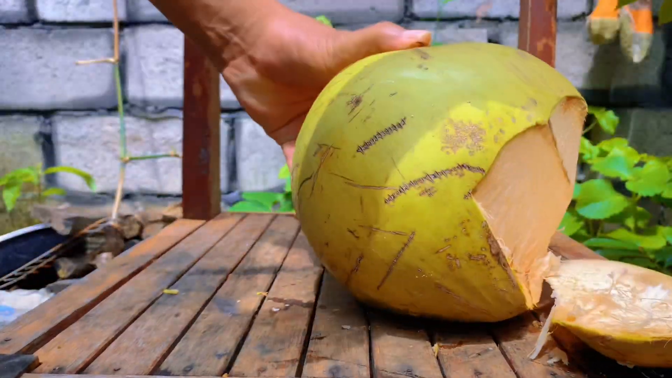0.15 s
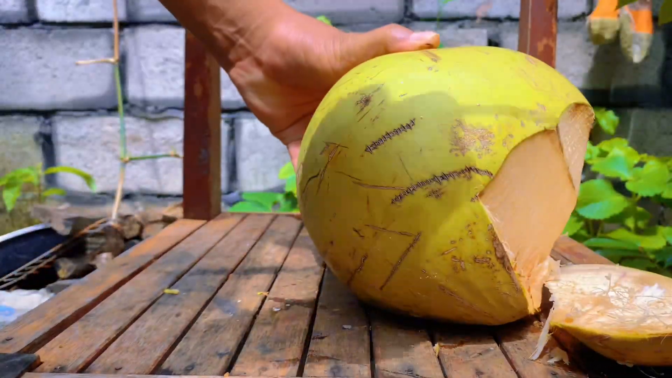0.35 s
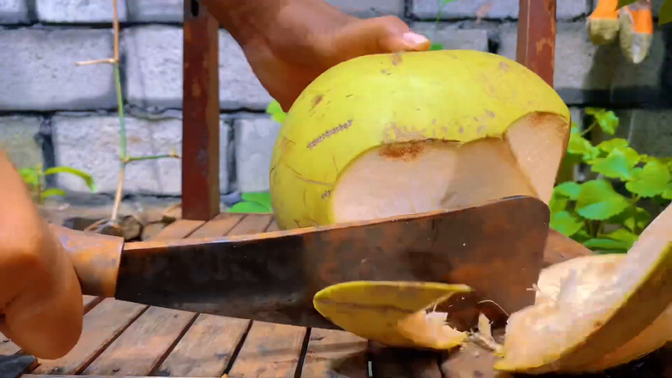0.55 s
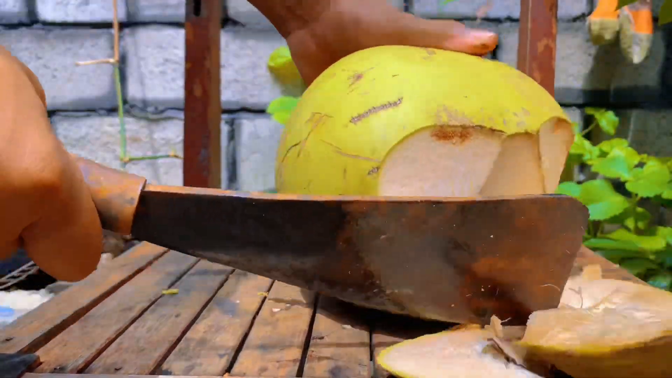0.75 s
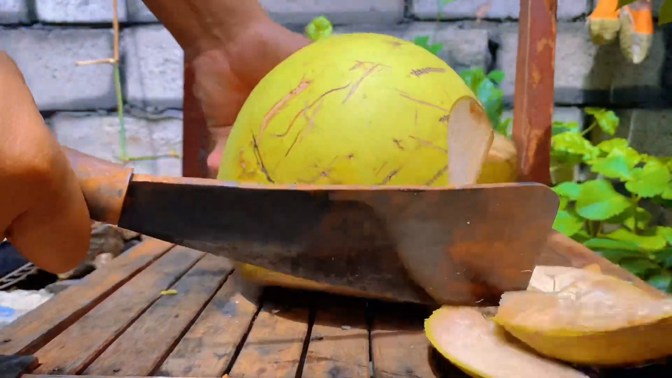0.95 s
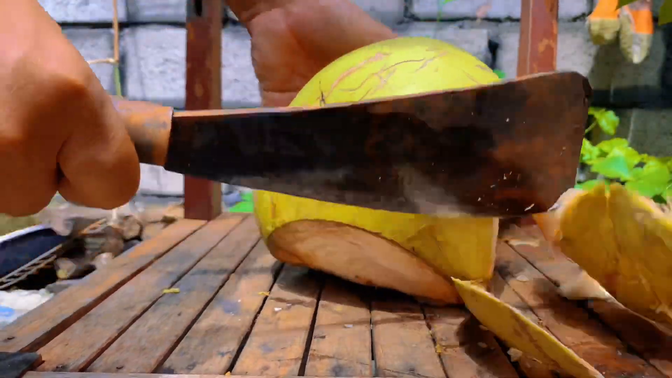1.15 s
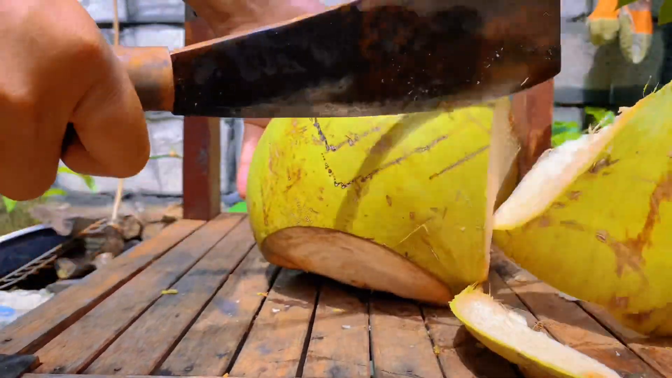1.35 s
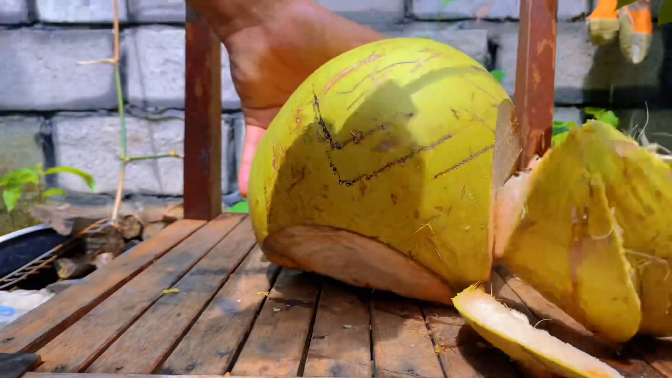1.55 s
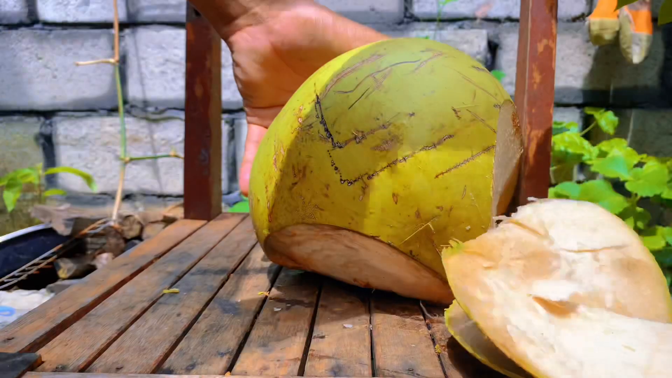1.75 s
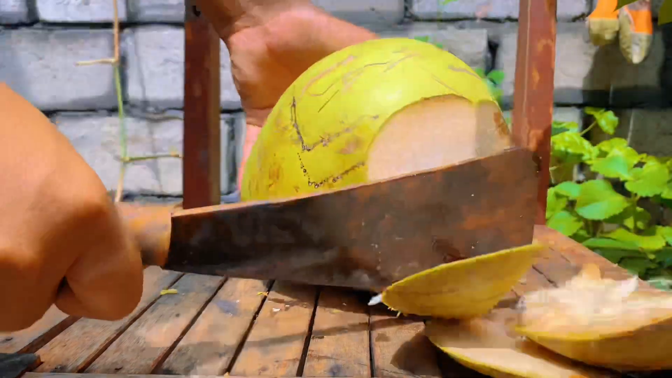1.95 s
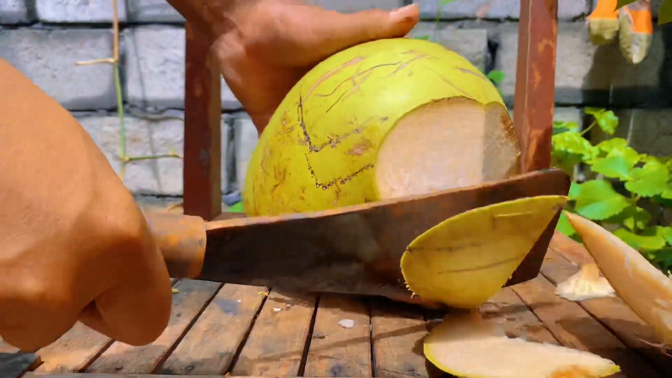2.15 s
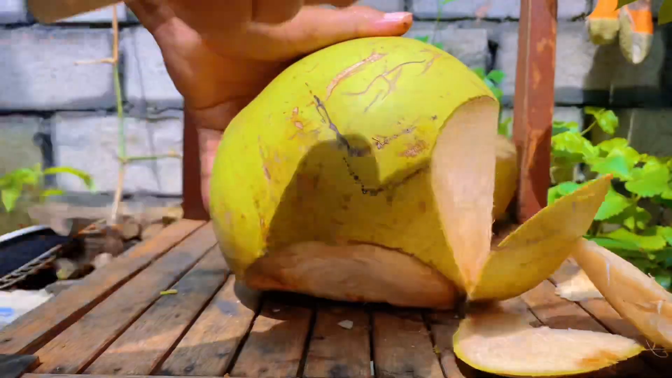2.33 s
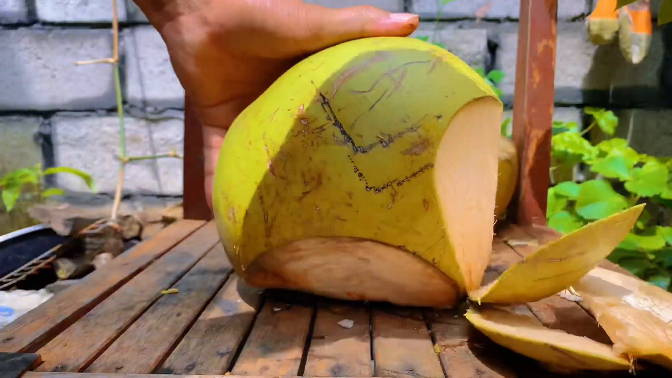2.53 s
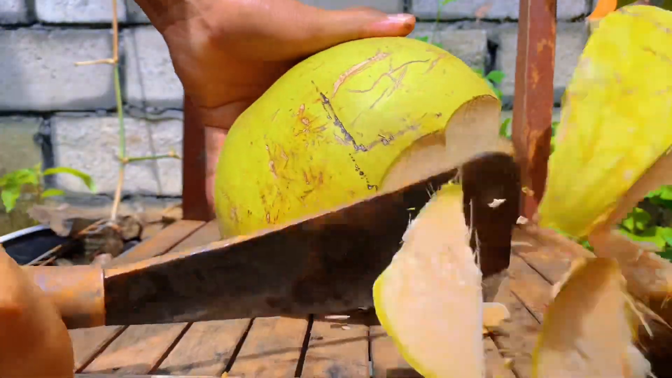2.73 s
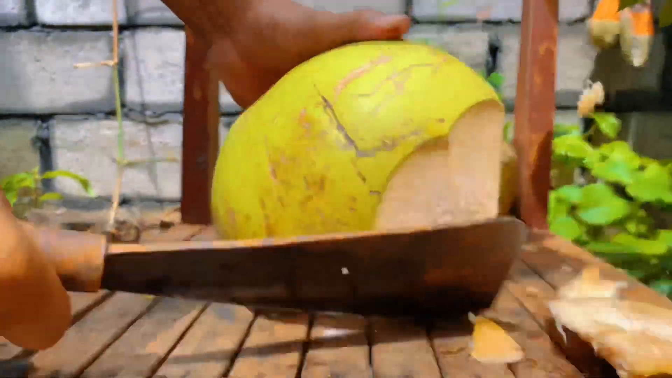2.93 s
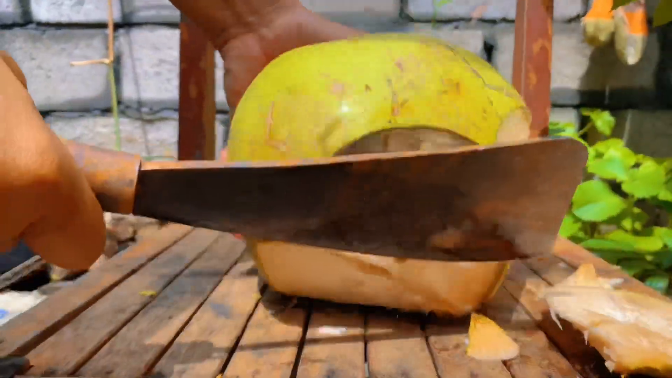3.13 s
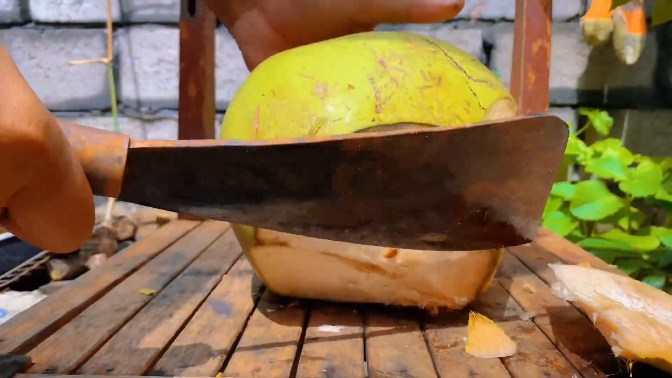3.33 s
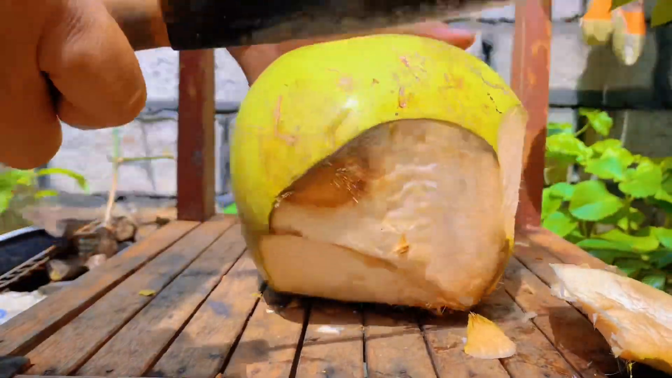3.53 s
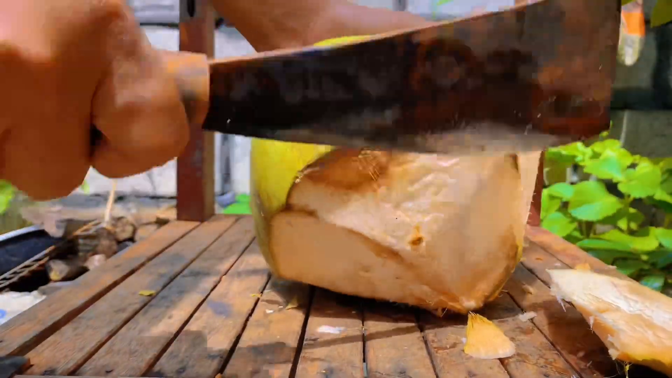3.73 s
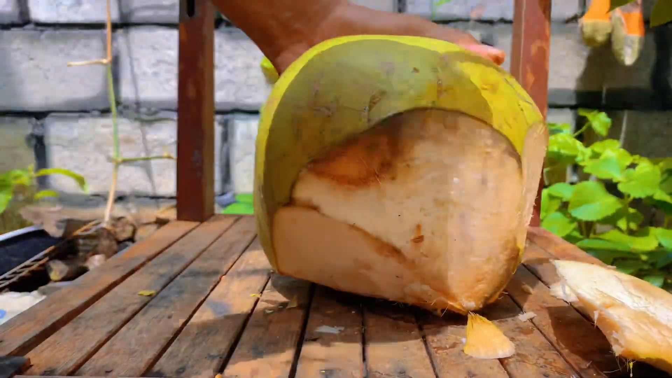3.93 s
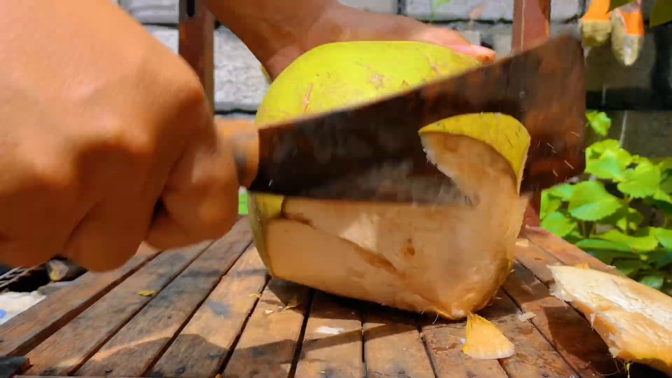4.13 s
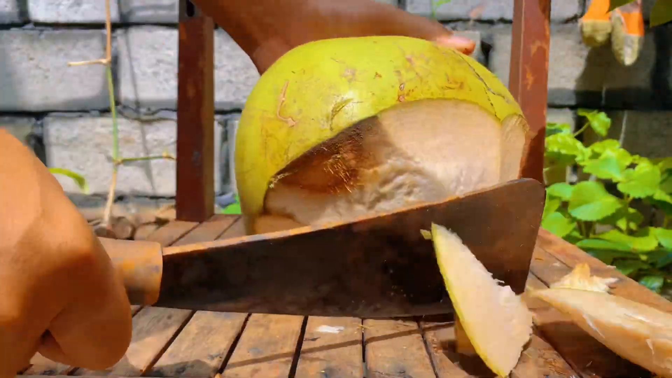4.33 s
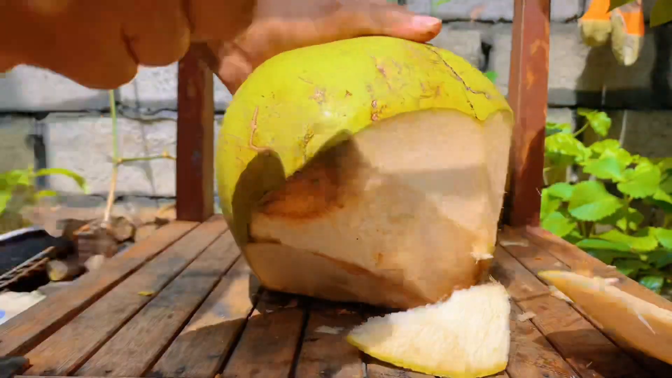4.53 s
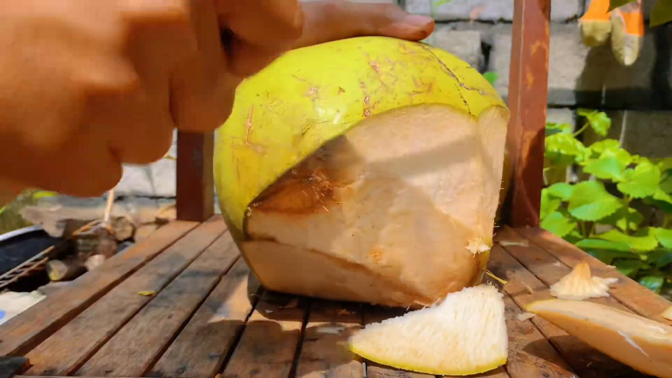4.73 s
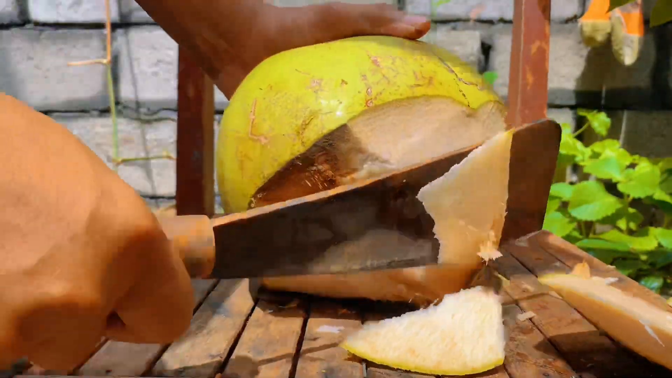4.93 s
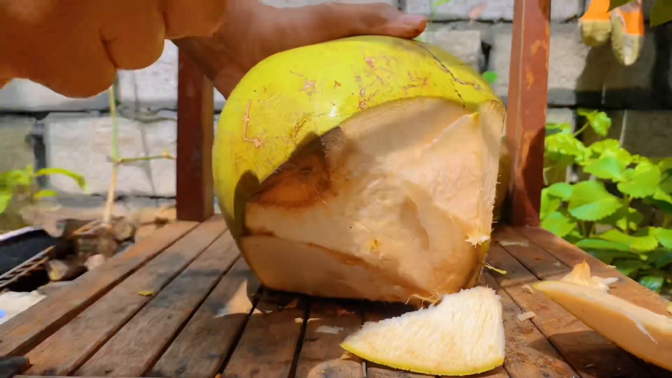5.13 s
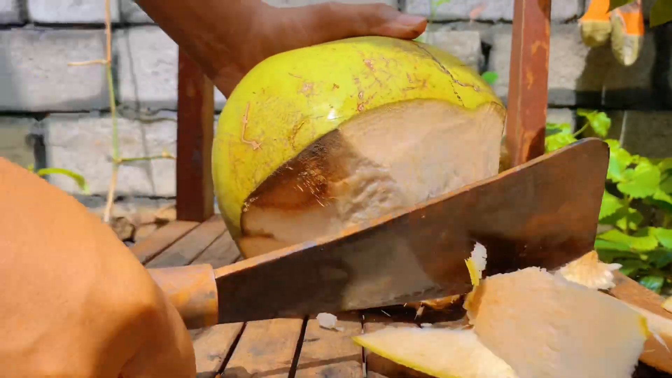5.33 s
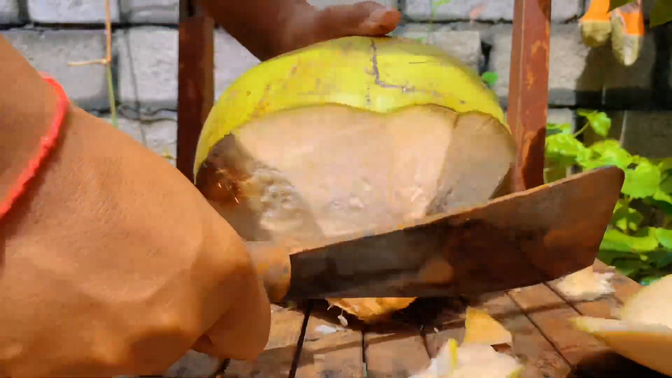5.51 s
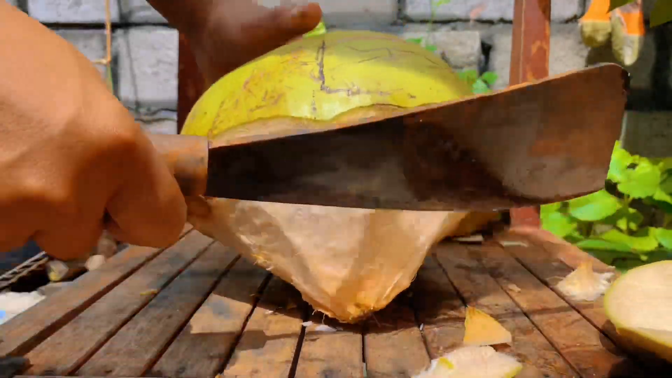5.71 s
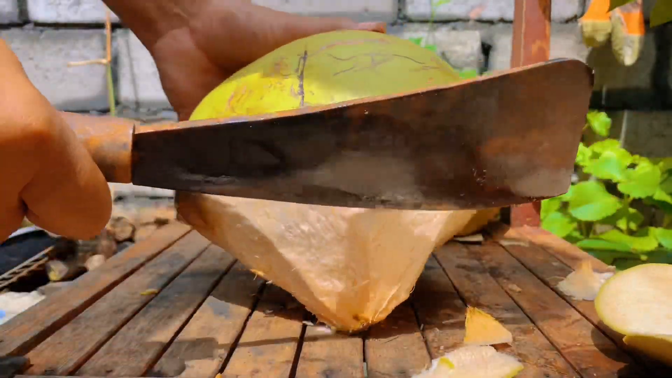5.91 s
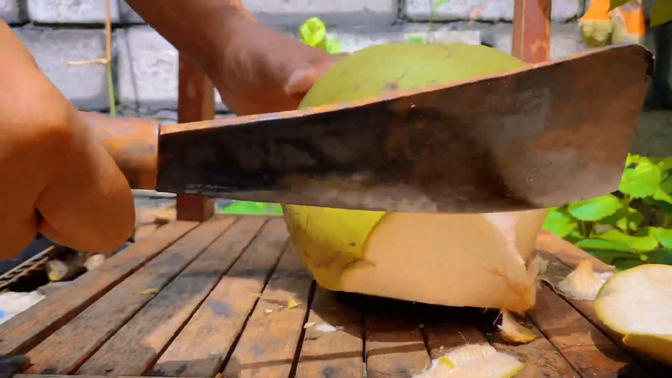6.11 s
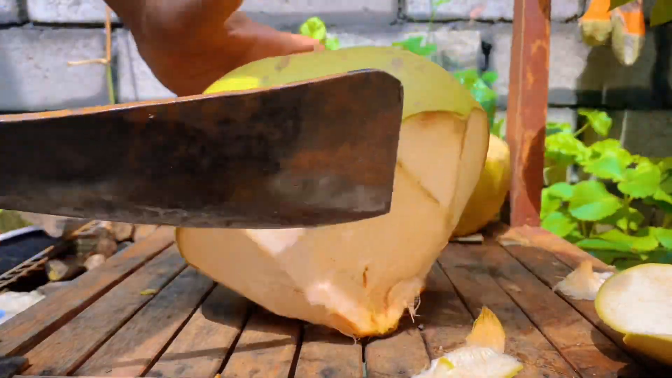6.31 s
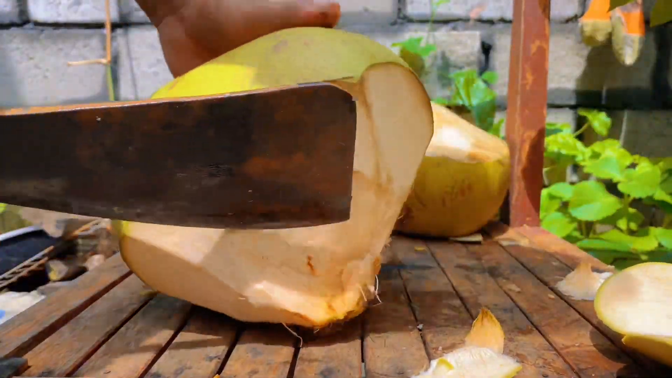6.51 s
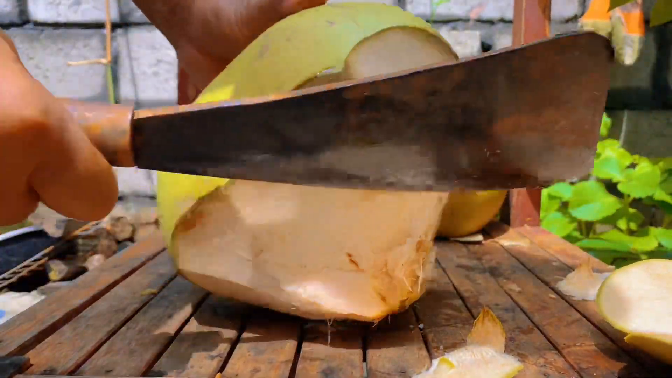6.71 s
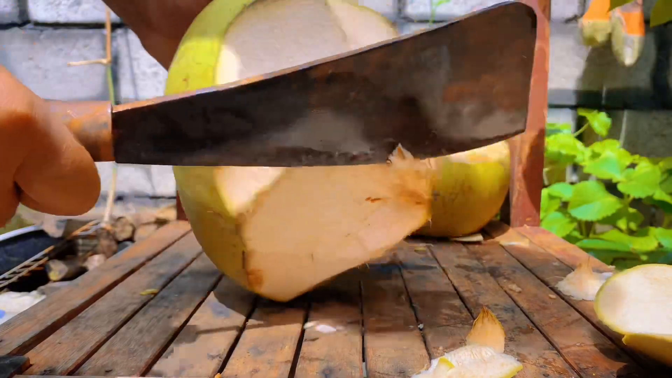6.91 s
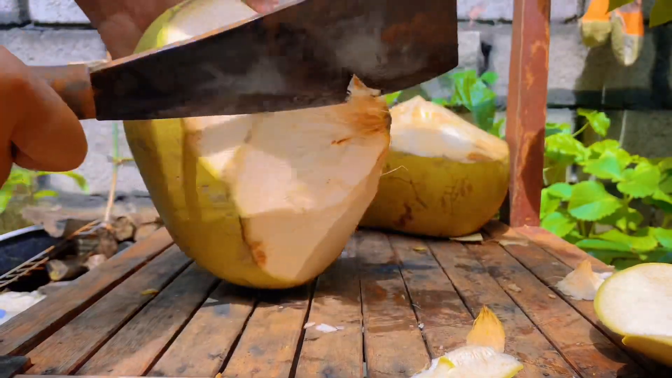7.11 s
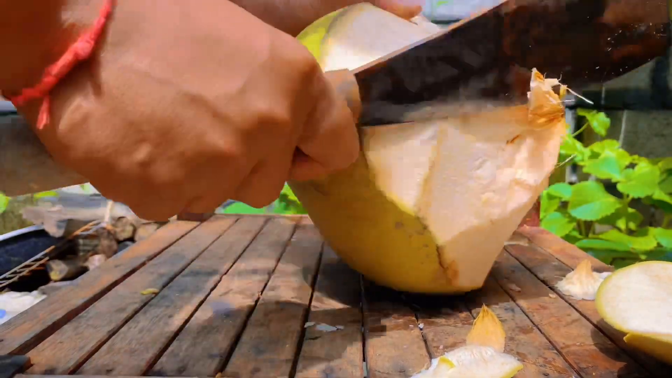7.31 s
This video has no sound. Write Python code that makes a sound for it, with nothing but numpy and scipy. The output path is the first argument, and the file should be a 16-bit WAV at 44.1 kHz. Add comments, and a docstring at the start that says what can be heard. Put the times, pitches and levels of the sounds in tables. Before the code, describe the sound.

Three strong chops in the first three seconds, each a fibrous crunch with a steely edge and a woody thud, followed by rattling chips, low rumbling and dry husk rubs. Dull knocks hit the microphone, then it grows quiet with softer cuts and taps. A last hard blow lands past five seconds, leaving small taps and rustle. Close stereo microphone, short yard echo.

```python
"""A machete trims a green coconut on a slatted wooden table in a walled yard.
Each chop is a jerky burst of fibre clicks that excites blade resonances, a crack with damped modes, and a thud;
chips tap the slats. Between chops the turning nut rubs as filtered clicks, with fibre snaps and thin squeaks.
The yard answers with decaying noise. A few dry hollow bumps, swelling tones with a scuff, sit right at the
microphone; a faint distant hum is narrow noise."""
import sys
import numpy as np
from scipy import signal
from scipy.fft import rfft, irfft, next_fast_len
from scipy.io import wavfile

SR = 44100
rng = np.random.default_rng(int(sys.argv[2]) if len(sys.argv) > 2 else 0)


def write(x):
    x = np.atleast_2d(x).T
    wavfile.write(sys.argv[1], SR, np.round(np.clip(x, -1, 1) * 32767).astype(np.int16))


N = 328986
TIME = np.arange(N) / SR
AGE = TIME[:SR // 2]  # time since an event's onset, s

# The nut shifting on the table: t/s, table rumble level/dB, rolling level/dB
ROCKING = [(0.0, -43, -43.5), (0.31, -52, -54.5), (0.62, -43.5, -45.5), (1.02, -54.5, -50.5),
           (1.91, -52.5, -61), (2.1, -46, -42), (2.39, -50, -54.5), (2.64, -52, -58.5),
           (2.83, -50.5, -46.5), (2.95, -55, -62.5), (3.16, -64, -64.5), (3.82, -83.5, -81),
           (4.26, -80.5, -73), (5.28, -68, -76.5), (5.48, -64.5, -60.5), (5.75, -67, -71),
           (6.9, -66.5, -69.5), (7.46, -75, -73.5)]
# Faint rustle of husk under the hand: t/s, rubbing level/dB, fibre hiss level/dB
RUSTLE = [(0.0, -58.5, -68), (0.41, -65, -78), (0.64, -53.5, -62.5), (1.64, -65.5, -74.5), (2.16, -57, -57),
          (2.3, -61.5, -70), (3.95, -82, -96.5), (4.24, -78, -91), (5.28, -93, -99), (5.48, -68, -82.5),
          (7.1, -85.5, -87.5), (7.46, -75.5, -81.5)]
# Husk sliding as the nut is turned or the blade drawn back:
# t/s, length/s, rubbing level/dB, fibre hiss level/dB
SLIDES = [(0.12, 0.0026, -53.5, -67), (0.77, .15, -45, -51), (1.138, 0.1, -56, -63.5),
          (1.302, .005, -45, -70), (1.636, 0.0075, -54.5, -60.5), (2.138, 0.18, -54, -61),
          (2.255, 0.082, -49.5, -59.5), (3.25, .01, -73, -74), (3.668, 0.0041, -73.5, -75),
          (4.366, .01, -76, -94), (4.42, 0.019, -77, -79), (4.984, .02, -71, -70.5),
          (5.966, 0.12, -67, -71.5), (6.209, .045, -69.5, -75.5), (6.346, 0.0054, -69, -80),
          (6.622, 0.067, -58, -65.5), (6.751, 0.0089, -66, -72), (6.901, .08, -79, -82),
          (7.183, 0.24, -69.5, -78)]
# Hollow bumps at the microphone: t/s, level/dB, pitch f/Hz, scuff level/dB, scuff low-pass f/Hz, boom level/dB
BUMPS = [(0.027, -27, 310, -44, 4970, -36.5), (0.1419, -27.5, 269, -65, 3500, -38),
         (0.1455, -31.5, 536, -51, 2000, -54), (0.236, -38.5, 330, -54, 5030, -61),
         (0.235, -42.5, 520, -57, 2000, -45), (2.9069, -22, 367, -24, 1500, -37.5),
         (2.9134, -12.5, 1000, -14.5, 4730, -27), (2.92, -8, 465, -13.5, 6500, -21),
         (2.923, -20, 139, -10.5, 900, -24), (3.156, -15, 478, -32, 5000, -56),
         (3.1965, -31.5, 404, -45.5, 2940, -52), (3.2022, -16.5, 507, -41.5, 1506, -50.5)]
# Husk catching as it slides: t/s, length/s, pitch f/Hz, bandwidth/Hz, level/dB
SQUEAKS = [(0.29, 0.37, 1850, 210, -69), (0.744, 0.04, 1810, 300, -47.5), (1.43, 0.067, 913, 116, -62),
           (1.527, 0.088, 3380, 300, -67), (2.165, 0.078, 6460, 251, -59), (5.925, .17, 2077, 350, -66.5),
           (6.03, 0.065, 1260, 200, -64)]
# Blade passing through husk: t/s, length/s, level/dB, treble tilt above 1 kHz/(dB per octave)
CUTS = [(0.4157, 0.021, -13.5, 0), (1.8928, 0.021, -14.5, -0.5), (2.6764, 0.016, -14.5, 0.8),
        (4.1524, 0.027, -35.5, 1.5), (4.796, 0.0097, -43, -0.5), (4.806, 0.016, -34, 2.5),
        (5.2908, .003, -41, -2), (5.3084, 0.0072, -40.5, 2), (5.3196, 0.0043, -14, -6.5)]
# Blade biting or landing and driving the nut onto the table:
# t/s, knock level/dB, pitch f/Hz, low-pass f/Hz, left minus right/dB, thud level/dB, thud f/Hz
BLOWS = [(0.4183, -3.5, 955, 3040, -12.5, -11, 319), (0.426, -14, 1900, 4000, -5, -13.5, 162),
         (0.4366, -11, 1530, 2950, -9, -5.5, 227.5), (1.8958, -4, 910, 2570, -2, -14, 343),
         (1.908, -9.5, 1570, 3084, -4, -6, 242), (2.682, -17, 1350, 2900, -2, -37, 300),
         (2.697, 4, 1110, 2202, -2, -1.5, 212.9), (4.154, -19, 716.7, 1700, -9.5, -27.5, 254),
         (4.7994, -39, 1145, 1816, 0.5, -34, 285.6), (4.817, -44, 1400, 2500, -2, -33, 251),
         (5.2923, -45.5, 1400, 4000, -1, -31.5, 200), (5.3239, -4, 1200, 2880, -0.5, -5, 237),
         (5.324, -8, 2500, 5840, 2.5, -21.5, 150)]
# Chips and nut tapping the slats: t/s, knock level/dB, low-pass f/Hz, thud level/dB
TAPS = [(0.649, -43.5, 1500, -47), (0.973, -44, 1500, -45), (1.106, -40, 2210, -37),
        (1.1359, -36, 1840, -35.5), (1.298, -19.5, 2400, -35), (1.344, -30, 3500, -20.5),
        (1.965, -17.5, 2040, -36), (1.9977, -22, 1700, -42), (2.0172, -14, 2330, -28.5),
        (2.031, -15, 2000, -26), (2.0782, -22.5, 2050, -33.5), (2.5217, -36, 1490, -39.5),
        (2.809, -23.5, 3020, -26.5), (3.036, -56, 3000, -64), (3.6651, -46.5, 3016, -43),
        (4.2405, -34, 1800, -39.5), (4.443, -58.5, 2500, -50), (4.872, -39, 1600, -46),
        (4.9283, -38, 1780, -45.5), (5.01, -49, 1492, -60), (5.062, -55, 1800, -66),
        (5.726, -35.5, 6030, -62), (6.117, -39.5, 2230, -35.5), (6.1757, -53, 2000, -41.5),
        (6.239, -49, 3010, -47.5)]
# The nut tipping onto another face and rocking for a moment: t/s, thud level/dB, rocking level/dB
TIPS = [(0.56, -37, -46.5), (0.759, -33.5, -47), (1.295, -32, -38), (1.656, -35.5, -51), (2.22, -41, -45),
        (2.46, -47, -43), (4.22, -41, -58), (6.15, -39, -53.5), (6.26, -48.5, -59), (6.893, -48, -60),
        (7.02, -55, -59), (7.28, -53, -67)]
# The loudest fibres snapping: t/s, level/dB
SNAPS = [(0.565, -37.5), (0.624, -44), (0.6985, -36.5), (1.345, -31), (2.136, -31), (2.255, -41.5),
         (3.46, -54.5), (4.859, -40.5), (6.125, -45), (6.35, -60)]

# Modes of a hollow bump: f ratio to its pitch, level/dB, t60/s
HOLLOW_MODES = [(1.0, 6.5, .013), (1.2, -10.5, 0.026), (.76, -7, 0.018), (0.381, -18.5, .02)]
# Modes of a hard contact before strike-to-strike scatter: f ratio to its pitch, level/dB, t60/s
CONTACT_MODES = [(.52, -11, 0.015), (.78, -0.5, 0.01), (1, 0.5, 0.0085), (1.421, -7, 0.043),
                 (2.1, -9, 0.0065), (3.0, -13.5, 0.0077)]
# Modes of a struck slat: f/Hz, level/dB, t60/s
SLAT_MODES = [(750, -20, 0.04), (1243, -27, 0.16), (1884, -26, .06)]
# Modes of the table: f/Hz, level/dB, t60/s
TABLE_MODES = [(68, -24, 0.22), (142.6, -18, 0.18), (152.3, -18.5, .16), (226, -15, 0.18), (329, -20, .12),
               (430, -15, 0.067), (665, -25, 0.09)]
# Slat resonances under the rubbing: f/Hz, bandwidth/Hz, level/dB
SLAT_RESONANCES = [(680, 41, 2.5), (901, 35, -4), (1290, 11, 5), (1566, 50, 2), (2030, 170, -1.5),
                   (4270, 400, -0.5), (5926, 210, 1)]
# Blade resonances under the tearing, relative to one another: f/Hz, bandwidth/Hz, level/dB
BLADE_RESONANCES = [(1626, 63, -6), (2050, 210, -5.5), (2740, 40, -7), (4060, 260, -4), (4730, 42, -5.5),
                    (6470, 290, -7), (9880, 400, -11), (10943, 150, -11)]

# Spectral shape of the table rumble: f/Hz, relative level per Hz/dB
RUMBLE_SPECTRUM = [(15, -22.5), (30, -12.5), (52, -8), (68, 4.5), (90, -14.5), (130, -10), (250, -56.5)]
# Spectral shape of the rolling nut: f/Hz, relative level per Hz/dB
ROLL_SPECTRUM = [(70, -27.5), (135, 2.5), (175, 0), (230, -0.5), (320, -8.5), (500, -15), (900, -45)]
# Spectral shape of husk rubbing: f/Hz, relative level per Hz/dB
RUB_SPECTRUM = [(200, -15), (450, 2), (900, 2), (2000, -2), (3000, -2), (5500, -10.5), (8000, -22.5),
                (12000, -41)]
# Spectral shape of fibre hiss: f/Hz, relative level per Hz/dB
HISS_SPECTRUM = [(2500, -25), (6300, -3.5), (7900, -9.5), (10200, 1), (11300, -0.5), (12400, -16.5),
                 (14200, -5.5), (16000, -26.5)]
# Spectral shape of tearing fibres: f/Hz, relative level per Hz/dB
TEAR_SPECTRUM = [(150, -16), (400, -7.5), (700, -3.5), (1400, -13.5), (2800, -14.5), (4100, -11),
                 (6700, -15), (7800, -18.5), (10000, -9.5), (11300, -11), (12500, -25), (14400, -17),
                 (16000, -34)]
# Spectral shape of the crack at a hard contact: f/Hz, relative level per Hz/dB
CRACK_SPECTRUM = [(200, -10.5), (700, 1), (2000, -0.5), (4500, 1), (9000, -12), (16000, -26)]
# Spectral shape of a snapping fibre: f/Hz, relative level per Hz/dB
SNAP_SPECTRUM = [(500, -20.5), (2000, -3), (6000, -8), (10500, -3), (12400, -12.5), (14300, -2.5),
                 (16500, -12.5)]
# Later echo of the yard: f/Hz, level/dB
YARD_LEVEL = [(80, -19.5), (250, -15), (700, -15.5), (1500, -18.5), (5000, -21.5), (12000, -26.5)]
# Left microphone port ahead of the right, for sound from the table: f/Hz, phase/rad
PORT_PHASE = [(120, 0.9), (280, -.35), (500, .45), (1000, 0.2), (2500, .1), (5000, 0)]

SLIDE_RISE_DB_PER_S, SLIDE_SAG_DB_PER_S, SLIDE_FALL_DB_PER_S = 445, 28.5, 172
ROCK_RISE_S, ROCK_T60_S = 0.051, 0.81
ROCK_ROLL_DB = -6  # rolling is weaker than the rumble it sets off
BLOW_ROCK_DB = -35  # rocking set off by a blow, against its thud
TAP_HZ, TAP_PAN_DB, TAP_THUD_HZ, TIP_HZ = 1400, -3, 258.66, 200
THUD_DELAY_S = 0.0055  # the nut meets the table just after each knock
BLOW_BOUNCE_T60_S, LIGHT_BOUNCE_T60_S = 0.015, 0.011
SMALL_SNAPS_PER_S, SMALL_SNAP_DB = 5.2, 13.5  # random times; level over the rustle's hiss curve
HUM_PEAK_S = 4.45
CUTOFF_HZ = 16300


def from_db(db):
    """Decibels to gain."""
    return 10 ** (np.asarray(db) / 20)


def rms_one(x):
    """Scale to unit power."""
    return x / np.sqrt(np.mean(x ** 2) + 1e-20)


def at_hz(points, hz):
    """Read a table on a log-frequency axis."""
    f, value = np.transpose(points)
    return np.interp(np.log(np.maximum(hz, 1)), np.log(f), value)


def gains(rows):
    """Turn level curves in dB into gains at every sample."""
    s, *columns = np.transpose(rows)
    return [from_db(np.interp(TIME, s, column)) for column in columns]


def fade(t60, age=AGE):
    """Exponential decay, 60 dB down after t60 seconds."""
    return np.exp(-np.log(1000) * age / t60)


def add(track, s, sound):
    """Mix a sound into a track from time s."""
    i = max(round(s * SR), 0)
    track[..., i:i + sound.shape[-1]] += sound[..., :track.shape[-1] - i]


def lowpass(x, hz, order=2):
    """Butterworth low-pass."""
    sections = signal.butter(order, min(hz, SR / 2 - 1), fs=SR, output="sos")
    return signal.sosfilt(sections, x + 1e-18)


def colour(x, spectrum, tilt=0, size=8192):
    """Minimum-phase filter of unit power, tilted above 1 kHz in dB per octave."""
    hz = np.maximum(np.fft.rfftfreq(size, 1 / SR), 1)
    octaves = np.log2(np.maximum(hz / 1000, 1))
    magnitude = rms_one(from_db(at_hz(spectrum, hz) + tilt * octaves))
    # folding the cepstrum puts all the energy after the onset
    cepstrum = irfft(np.log(magnitude))
    cepstrum[1:size // 2] *= 2
    cepstrum[size // 2 + 1:] = 0
    impulse = irfft(np.exp(rfft(cepstrum)))
    return signal.oaconvolve(x, impulse[None], axes=-1)[:, :x.shape[-1]]


def place(x, pan_db, lag_ms):
    """Place a mono sound by left-over-right level and a lag of the left side."""
    t = np.arange(len(x)) / SR
    half = lag_ms / 2000  # half the lag, in seconds
    left = np.interp(t - half, t, x) * from_db(pan_db / 2)
    right = np.interp(t + half, t, x) * from_db(-pan_db / 2)
    return np.array([left, right])


def grains(count, spread_db, alike, lag_ms):
    """Stereo stream of tiny clicks of uneven size, partly shared by both sides; unit power."""
    sizes = from_db(spread_db * np.clip(rng.standard_normal((3, count)), -2, 2))
    shared, left, right = rng.standard_normal((3, count)) * sizes
    alike = np.clip(alike, 0, 1)
    common = np.sqrt(alike) * place(shared, 0, lag_ms)
    separate = np.sqrt(1 - alike) * np.array([left, right])
    return rms_one(common + separate)


def flutter(count, per_s, depth_db):
    """A gain that wanders at random."""
    knots = rng.standard_normal(8192)
    wander = np.interp(np.arange(count) / SR * per_s, np.arange(len(knots)), knots)
    return from_db(depth_db * wander)


def ring(modes, pitch=1):
    """Sum of struck modes, each a decaying sine, with alternating signs."""
    out = np.zeros(len(AGE))
    for k, (f, db, t60) in enumerate(modes):
        out += (-1) ** k * from_db(db) * fade(t60) * np.sin(2 * np.pi * f * pitch * AGE)
    return out


def swell(hz, t60):
    """A soft contact: the vibration builds smoothly, then dies; its envelope peaks at 1."""
    shape = AGE ** 2 * fade(t60)
    return shape / shape.max() * np.sin(2 * np.pi * hz * AGE)


def resonate(x, peaks):
    """What a body with these resonances adds to a sound."""
    out = 0
    for hz, width, db in peaks:
        b, a = signal.iirpeak(hz, hz / width, SR)
        out = out + from_db(db) * signal.lfilter(b, a, x + 1e-18)
    return out


def narrow(count, hz, width_hz):
    """Stereo noise through one resonance twice; unit power."""
    b, a = signal.iirpeak(hz, hz / width_hz, SR)
    noise = grains(count, spread_db=2.5, alike=0.42, lag_ms=0)
    return rms_one(signal.lfilter(b, a, signal.lfilter(b, a, noise)))


def rocking(lumps_per_s=14, lumps_db=2):
    """Gains of rumble and rolling: uneven shifting, and a dying spell after each tip or blow."""
    spells = [(s, db) for s, _, db in TIPS]
    spells += [(s, thud_db + BLOW_ROCK_DB) for s, *_, thud_db, _hz in BLOWS]
    power = np.zeros(N)
    shape = np.minimum(AGE / ROCK_RISE_S, 1) * fade(ROCK_T60_S)
    for s, db in spells:
        add(power, s, (from_db(db) * shape) ** 2)
    rumble, roll = np.array(gains(ROCKING)) * flutter(N, lumps_per_s, depth_db=lumps_db)
    spell = np.sqrt(power)
    return np.hypot(rumble, spell), np.hypot(roll, from_db(ROCK_ROLL_DB) * spell)


def sliding(rub_rest_db=-3, hiss_rest_db=-3):
    """Gains of rubbing and hiss: each slide sets in quickly, eases off and dies away into the rustle."""
    rest = np.array(gains(RUSTLE)) * from_db([[rub_rest_db], [hiss_rest_db]])
    power = rest ** 2
    for s, length, rub_db, hiss_db in SLIDES:
        age = TIME - s
        drop = SLIDE_RISE_DB_PER_S * np.maximum(-age, 0)
        drop += SLIDE_SAG_DB_PER_S * np.clip(age, 0, length)
        drop += SLIDE_FALL_DB_PER_S * np.maximum(age - length, 0)
        heard = drop < 60
        power[:, heard] += from_db(np.array([[rub_db], [hiss_db]]) - drop[heard]) ** 2
    return np.sqrt(power)


def handling(rumble_db=2, roll_db=-1, rub_db=-2, hiss_db=1):
    """The turning nut shakes the table while its husk rubs on the slats and the hand."""
    rumble, roll = rocking()
    rub, hiss = sliding()
    rumble_noise = colour(grains(N, spread_db=-2, alike=1.0, lag_ms=0.096), RUMBLE_SPECTRUM)
    roll_noise = colour(grains(N, spread_db=1, alike=0.97, lag_ms=0.27), ROLL_SPECTRUM)
    low = from_db(rumble_db) * rumble * rumble_noise + from_db(roll_db) * roll * roll_noise
    rub_noise = colour(grains(N, spread_db=7.0, alike=0.35, lag_ms=-0.054), RUB_SPECTRUM)
    high = from_db(rub_db) * rub * rub_noise
    high += resonate(high, SLAT_RESONANCES)
    hiss_noise = colour(grains(N, spread_db=5.0, alike=0.51, lag_ms=0.2), HISS_SPECTRUM)
    high += from_db(hiss_db) * hiss * hiss_noise
    return (low + high * flutter(N, 81, depth_db=3.0)) * from_db([[-0.5], [0.5]])


def bumps(scuff_s=0.026, boom_hz=72, boom_s=0.033):
    """Close and dry: a short noise scuff, a hollow tone of soft modes and a low boom."""
    out = np.zeros((2, N))
    for s, db, hz, scuff_db, bright_hz, boom_db in BUMPS:
        tone = sum(from_db(level) * swell(ratio * hz, t60) for ratio, level, t60 in HOLLOW_MODES)
        body = from_db(db) * tone + from_db(boom_db) * swell(boom_hz, boom_s)
        noise = rng.standard_normal((2, len(AGE)))
        scuff = rms_one(lowpass(noise, bright_hz)) * fade(scuff_s)
        add(out, s, place(body, pan_db=5, lag_ms=0.62) + from_db(scuff_db) * scuff)
    return out


def squeaks():
    """Damp husk catches on steel or wood and sings briefly at one pitch."""
    out = np.zeros((2, N))
    for s, length, hz, width_hz, db in SQUEAKS:
        stroke = np.sqrt(np.abs(np.sin(np.pi * np.minimum(AGE / length, 1))))
        add(out, s, from_db(db) * stroke * narrow(len(AGE), hz, width_hz))
    return out


def pops(length, pop_hz=1700, pop_s=0.0084, rise_per_s=130, count=6):
    """Wet fibre bundles give way at random moments of the cut, each with a tiny rising chirp."""
    out = np.zeros(len(AGE))
    shape = AGE * fade(pop_s)
    shape = shape / shape.max()
    for when, pitch, size in rng.random((count, 3)):
        start_hz = pop_hz * 2 ** (pitch - 0.5)  # within half an octave either way
        phase = 2 * np.pi * start_hz * AGE * (1 + 0.5 * rise_per_s * AGE)
        add(out, when * length, (0.5 + size) * shape * np.sin(phase))
    return place(out, pan_db=-4.5, lag_ms=-0.05)


def cuts(release_s=0.03, blade_db=2, pop_db=-3):
    """Fibres part in a dense, jerky burst while the blade travels, and set the steel ringing."""
    out = np.zeros((2, N))
    for s, length, db, tilt in CUTS:
        stroke = fade(release_s, np.maximum(AGE - length, 0)) * flutter(len(AGE), 700, depth_db=1.5)
        fibres = grains(len(AGE), spread_db=-0.5, alike=0.5, lag_ms=-0.016)
        tear = colour(fibres * stroke, TEAR_SPECTRUM, tilt)
        add(out, s, from_db(db) * (tear + from_db(pop_db) * pops(length)))
    blade = from_db(blade_db) * resonate(out, BLADE_RESONANCES)
    return (out + blade) * from_db([[-3], [-2.5]])


def contacts():
    """Every hard contact: t/s, level/dB, pitch f/Hz, low-pass f/Hz, left minus right/dB."""
    blows = [row[:5] for row in BLOWS]
    taps = [(s, db, TAP_HZ, bright_hz, TAP_PAN_DB) for s, db, bright_hz, _ in TAPS]
    return blows + taps


def knocks(crack_db=-8, crack_s=0.027):
    """A short crack and damped modes, struck a little differently each time."""
    out = np.zeros((2, N))
    for s, db, hz, bright_hz, pan_db in contacts():
        modes = []
        for ratio, level, t60 in CONTACT_MODES:
            struck_ratio = ratio * (1 + 0.065 * rng.standard_normal())
            modes.append((struck_ratio, level + 2 * rng.standard_normal(), t60))
        crack = colour(grains(len(AGE), spread_db=2, alike=0.74, lag_ms=-0.13), CRACK_SPECTRUM)
        crack = from_db(crack_db) * fade(crack_s) * crack
        slat = ring(SLAT_MODES, 1 + 0.026 * rng.standard_normal())  # the slat underneath rings on
        wood = place(0.6 * ring(modes, hz) + slat, pan_db, lag_ms=-0.032)
        add(out, s, from_db(db) * lowpass(wood + crack, bright_hz))
    return out


def landings():
    """Every time the nut or a chip meets the table: t/s, level/dB, bounce f/Hz, bounce t60/s."""
    blows = [(s + THUD_DELAY_S, db, hz, BLOW_BOUNCE_T60_S) for s, *_, db, hz in BLOWS]
    taps = [(s + THUD_DELAY_S, db, TAP_THUD_HZ, LIGHT_BOUNCE_T60_S) for s, *_, db in TAPS]
    tips = [(s, db, TIP_HZ, LIGHT_BOUNCE_T60_S) for s, db, _ in TIPS]
    return blows + taps + tips


def thuds():
    """Each landing is a short, soft, low vibration, and the table modes ring on."""
    out = np.zeros(N)
    table = ring(TABLE_MODES) * (1 - fade(0.01))
    for s, db, hz, bounce_s in landings():
        add(out, s, from_db(db) * (swell(hz, bounce_s) + table))
    return place(out, pan_db=-1.23, lag_ms=0.25)


def snaps(snap_s=0.0027):
    """Tiny bright cracks: a few loud ones, and random small ones as loud as the rustle allows."""
    out = np.zeros((2, N))
    _, hiss = gains(RUSTLE)
    times = rng.uniform(0, TIME[-1], int(SMALL_SNAPS_PER_S * TIME[-1]))
    small = [(s, from_db(SMALL_SNAP_DB) * hiss[int(s * SR)]) for s in times]
    loud = [(s, from_db(db)) for s, db in SNAPS]
    for s, gain in loud + small:
        clicks = grains(SR // 20, spread_db=-4.0, alike=0.61, lag_ms=0)
        add(out, s, gain * fade(snap_s, AGE[:SR // 20]) * clicks)
    return colour(out, SNAP_SPECTRUM)


def yard(x, t60_s=0.4, damp_hz=15000, early_db=-10, early_s=0.11):
    """Quick scatter from table and wall, then a longer tail whose treble dies first."""
    white = rms_one(rng.standard_normal((2, len(AGE))))
    hz, spectrum, tail = np.fft.rfftfreq(len(AGE), 1 / SR), rfft(white), 0
    edges = np.geomspace(40, 20480, 19)  # half-octave bands
    for low, high in zip(edges, edges[1:]):
        centre = np.sqrt(low * high)
        band = irfft(spectrum * ((hz >= low) & (hz < high)), len(AGE))
        shape = fade(t60_s / (1 + centre / damp_hz)) * (1 - fade(0.045))
        tail = tail + band * shape / np.linalg.norm(shape) * from_db(at_hz(YARD_LEVEL, centre))
    early = rng.standard_normal((2, len(AGE))) * fade(early_s) * (1 - fade(0.0093))
    early *= from_db(early_db) / np.linalg.norm(early[0])
    early = early - lowpass(early, 250, order=1)  # the scatter is thin in the bass
    return signal.fftconvolve(x, tail + early, axes=-1)[:, :N]


def hum(hz=345, width_hz=90, peak_db=-68, fade_db_per_s=42):
    """A faint, distant hum, narrow noise that swells in the lull and fades again."""
    level_db = peak_db - fade_db_per_s * np.abs(TIME - HUM_PEAK_S)
    return from_db(level_db) * narrow(N, hz, width_hz)


def ports(x):
    """The two microphone ports hear the table slightly out of step: opposite phase turns per side."""
    size = next_fast_len(N + SR)
    turn = np.exp(0.5j * at_hz(PORT_PHASE, np.fft.rfftfreq(size, 1 / SR)))
    return irfft(rfft(x, size) * np.array([turn, turn.conj()]), size)[:, :N]


def scene():
    """Chopping heard with the yard; handling, the close bumps and the hum get no echo."""
    work = squeaks() + cuts() + knocks() + thuds() + snaps()
    return ports(handling() + work) + bumps() + yard(work) + hum()


def record(dry):
    """The loudest peaks are rounded and the top is cut."""
    rounded = 0.95 * np.tanh(dry / 0.95)
    top_cut = signal.ellip(10, 0.2, 80, CUTOFF_HZ, fs=SR, output="sos")
    return signal.sosfilt(top_cut, rounded)


dry = scene()
out = record(dry)
write(out)
```